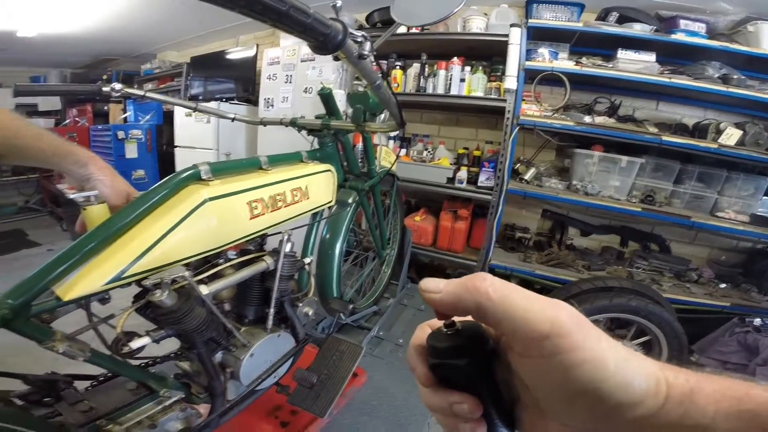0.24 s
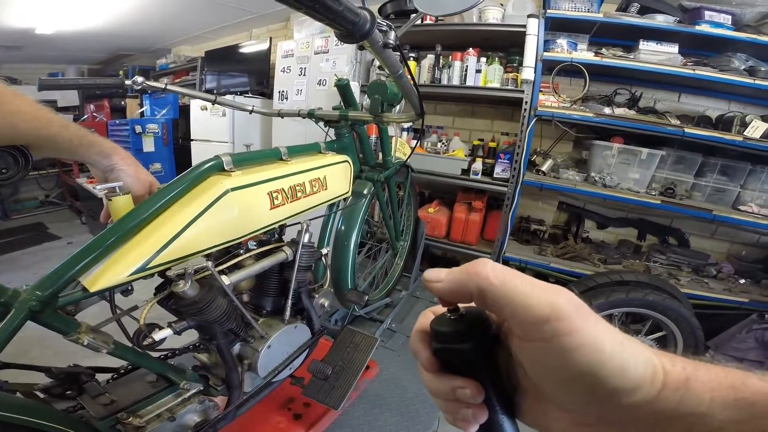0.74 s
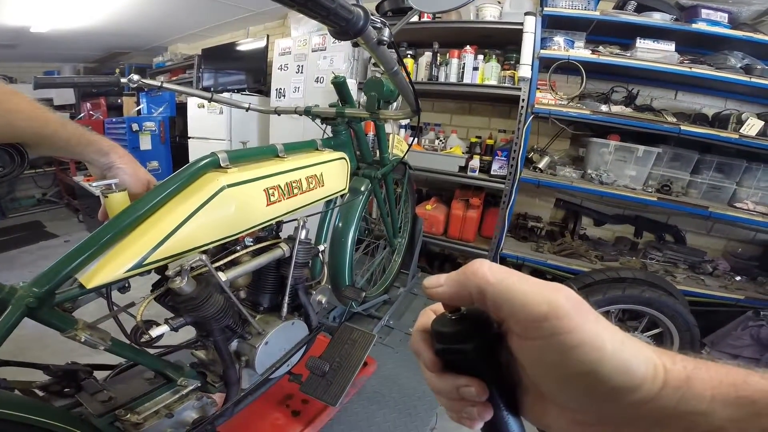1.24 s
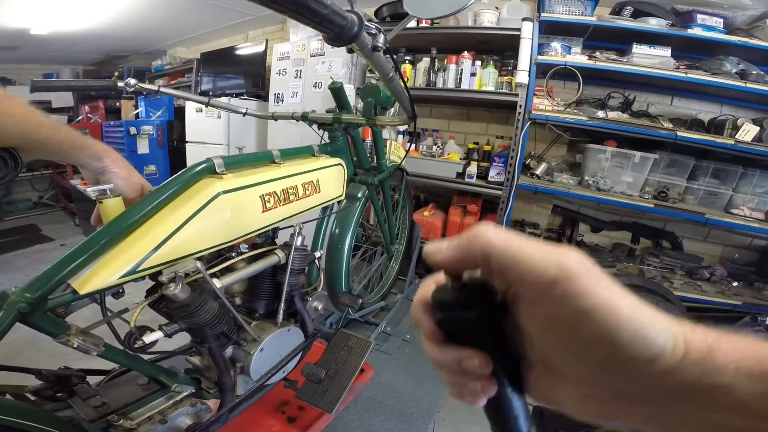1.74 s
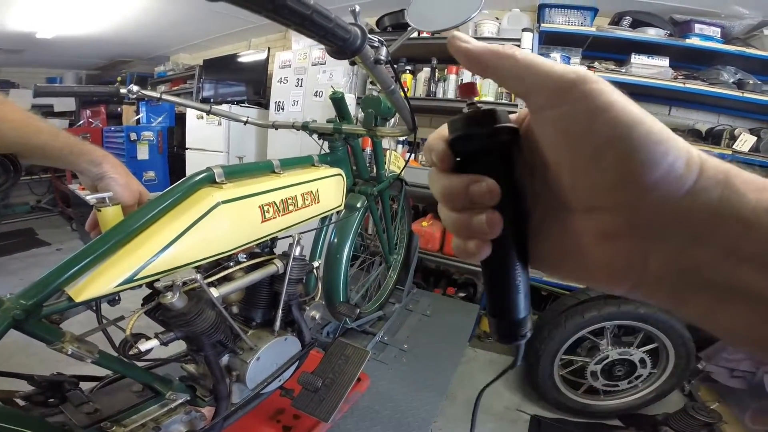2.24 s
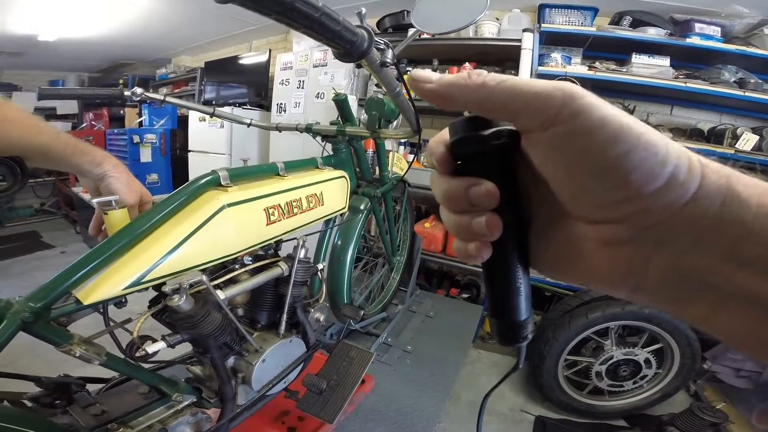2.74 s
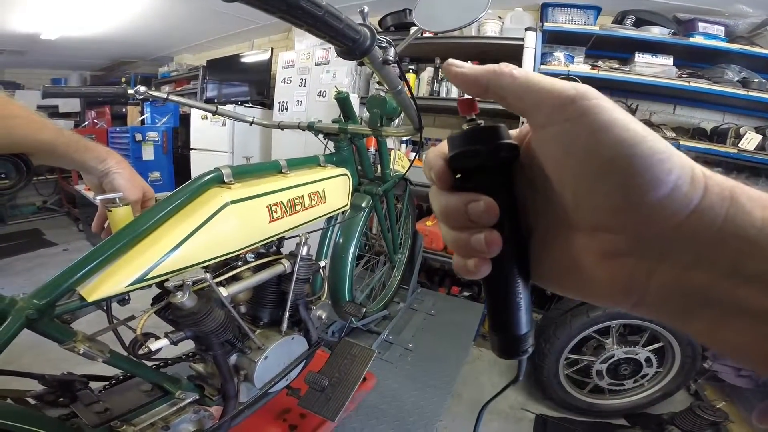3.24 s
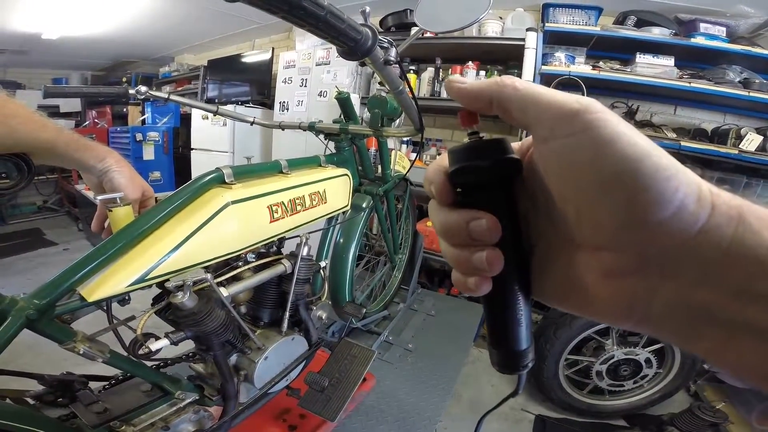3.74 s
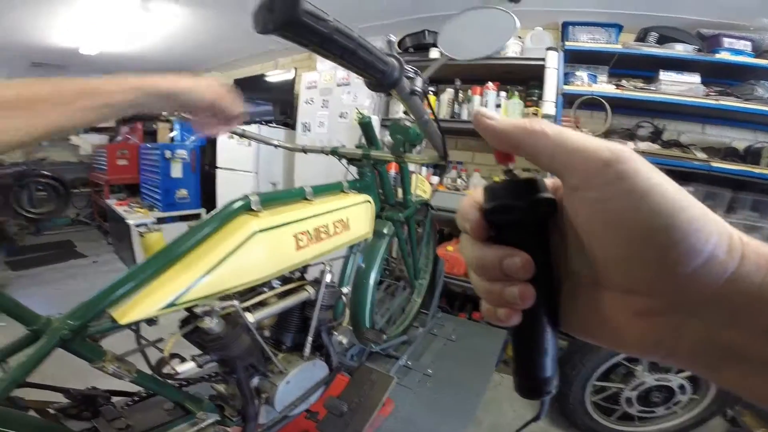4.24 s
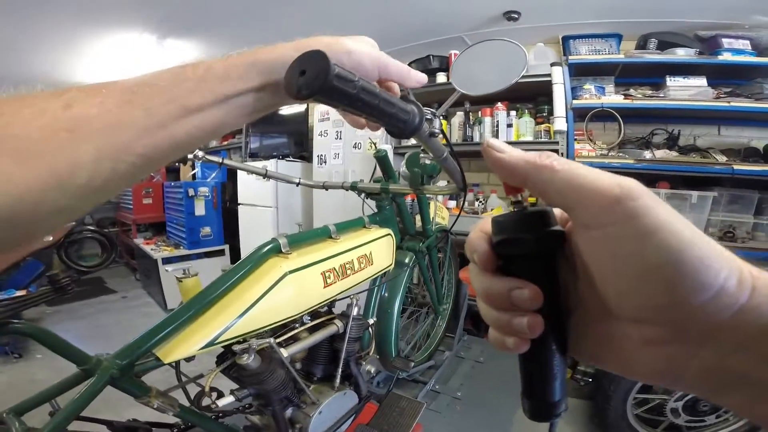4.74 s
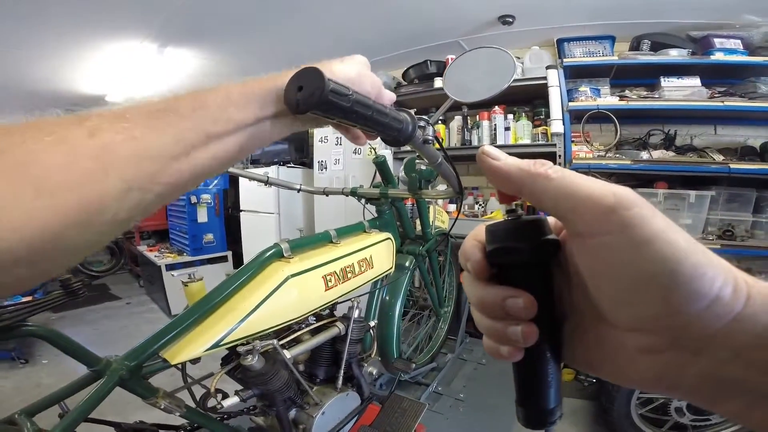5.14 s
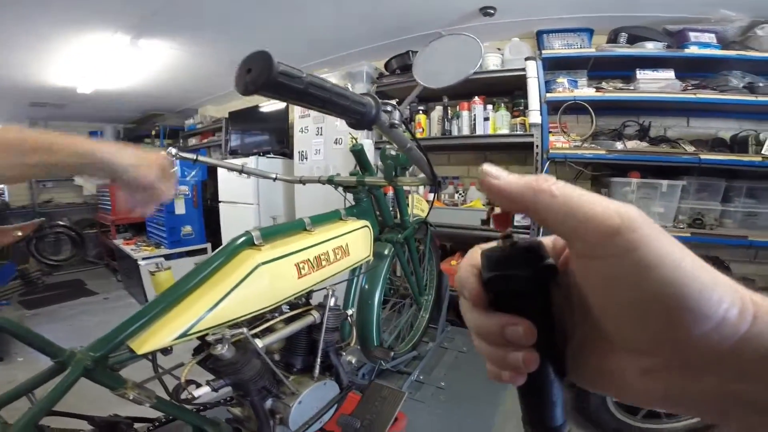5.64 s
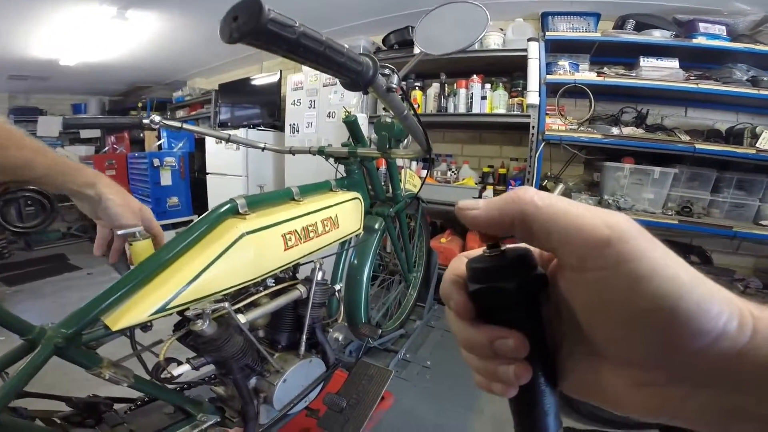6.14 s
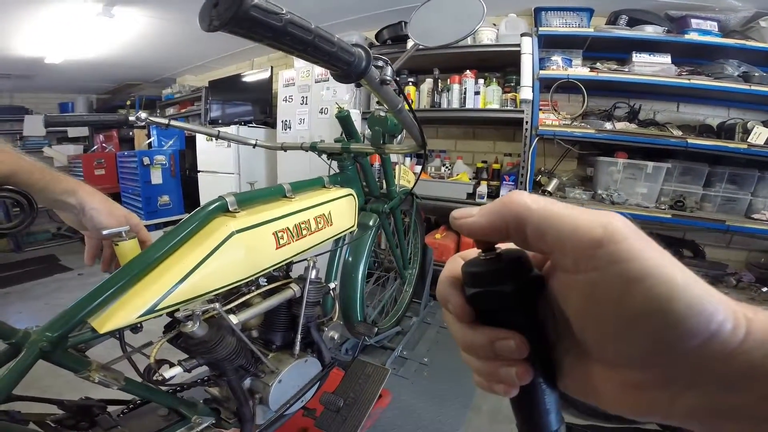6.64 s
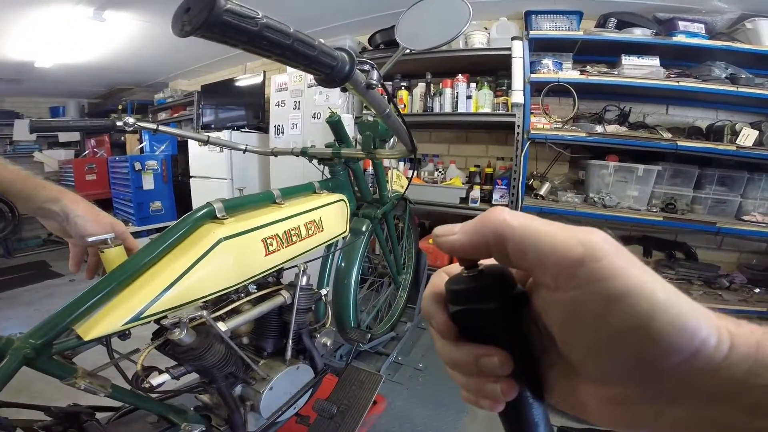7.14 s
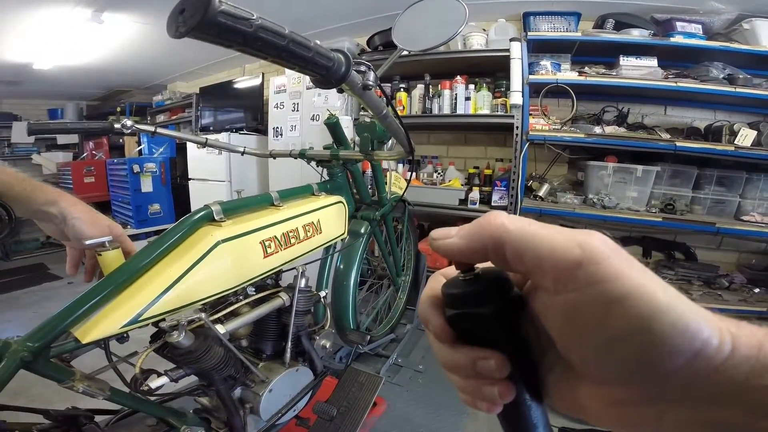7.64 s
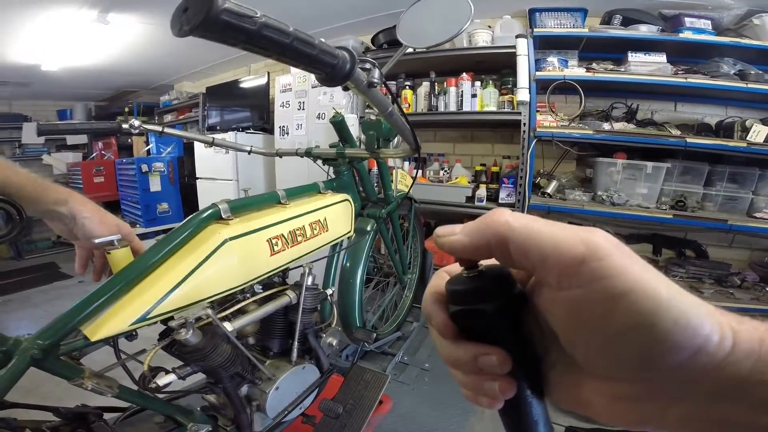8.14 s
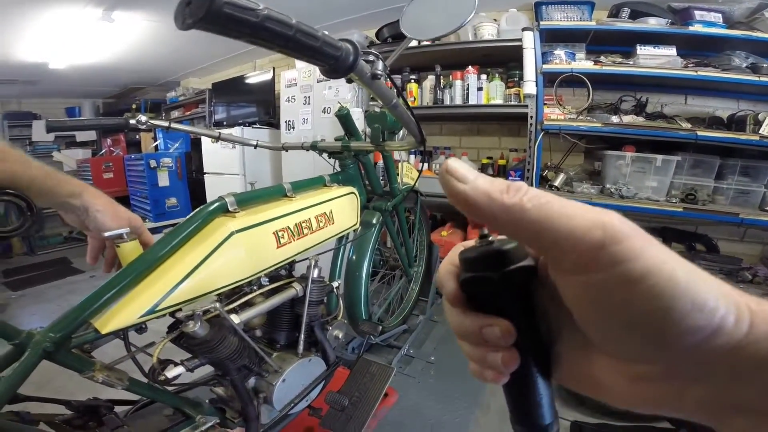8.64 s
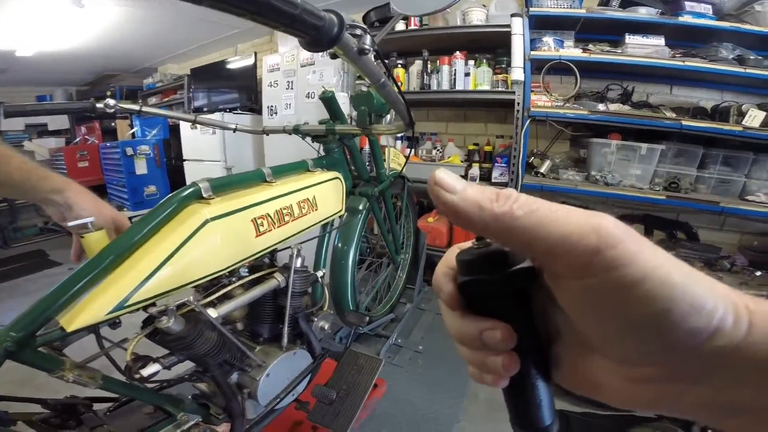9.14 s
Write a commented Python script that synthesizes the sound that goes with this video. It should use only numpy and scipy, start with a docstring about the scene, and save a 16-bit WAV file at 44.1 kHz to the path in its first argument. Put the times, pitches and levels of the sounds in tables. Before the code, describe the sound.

In a small workshop, two harsh geared starter bursts rise to a rasping whine with uneven engine puffs, then clatter loose and coast down.

```python
"""A gear rattle dies away first; then an electric starter cranks an old V-twin motorcycle twice, but it never fires.
Straight-cut gears whine in harmonics of the mesh rate and rasp as scraped noise, both coloured by their housing.
At speed the cylinders puff in uneven pairs: short pushes and noise bursts that ring the frame.
After each release noise bursts clack through the backlash, and a coasting armature whistles thinly downward.
A hand rubs and ticks lightly between the bursts; a small workshop reflects it all over faint air and whistle."""
import sys
import numpy as np
from scipy import signal
from scipy.fft import rfft, irfft
from scipy.io import wavfile

SR = 44100
rng = np.random.default_rng(int(sys.argv[2]) if len(sys.argv) > 2 else 0)


def master(y):
    """Save y as 16-bit WAV."""
    cut = np.clip(np.atleast_2d(y).T, -1, 1)
    pcm = np.round(cut * 32767)  # scale
    wavfile.write(sys.argv[1], SR, pcm.astype(np.int16))


N = 414981
TIME = np.arange(N) / SR  # s

# armature coasting: (whistle emerges [s], rotor at rest [s], relative level [dB])
COASTS = [(2.881, 3.95, -57), (9.051, 10.33, -68)]
# drive taking up its slack: (time [s], relative peak [dB], relative treble against middle [dB])
CLACKS = [(0.914, -31, -1), (2.365, -16, -6), (2.502, -18.5, -6.5), (2.62, -18, -5.5), (2.747, -23.5, -30),
          (2.867, -29, -21), (2.925, -48, -16), (2.969, -30.5, -29), (8.728, -16.5, -7.5),
          (8.809, -33, -12), (8.831, -14, -7), (8.984, -20.5, -7.5), (9.128, -22.5, -4), (9.285, -25, -38)]
# frame resonances: (centre [Hz], width [Hz], height over the broad response [dB])
FRAME_RINGS = [(151.5, 18, 5.8)]


def undb(db):
    """Amplitude ratio from its logarithmic measure in decibels."""
    return 10 ** (np.asarray(db) / 20)


def unit(x):
    """Normalisation to a root-mean-square of 1."""
    return x / np.sqrt(np.mean(x ** 2))


def noise():
    """White noise: equal mean power at every frequency."""
    return rng.standard_normal(N)


def walk(rate):
    """Random modulation: linear interpolation between random knots, rate of them per second, rms 1."""
    knots = rng.standard_normal(2 ** 14)
    return unit(np.interp(TIME * rate, np.arange(len(knots)), knots))


def since(s):
    """Elapsed time in seconds since a moment, zero before it."""
    return np.maximum(TIME - s, 0)


def gate(start, end, fade=0.01295):
    """Rectangular window with Gaussian skirts: one from start to end, fading quickly outside."""
    outside = np.maximum(start - TIME, TIME - end)
    return np.exp(-(np.maximum(outside, 0) / fade) ** 2)


def blow(s, rise, fall):
    """Envelope of one contact: a quadratic rise, then exponential decay, within half a second."""
    envelope = np.zeros(N)
    span = slice(int(s * SR), int(s * SR) + SR // 2)
    age = TIME[span] - s
    attack = np.clip(age / rise, 0, 1) ** 2
    envelope[span] = attack * np.exp(-np.maximum(age - rise, 0) / fall)
    return envelope


def convolve(x, response):
    """Linear superposition: the sound passes through an impulse response."""
    return signal.fftconvolve(x, response)[:N]


def colour(x, points, peaks=(), size=8192):
    """Minimum-phase filter of unit power: a broad spectrum with resonances on top."""
    f = np.maximum(np.fft.rfftfreq(size, 1 / SR), 1)
    hz, db = np.transpose(points)
    shape_db = np.interp(np.log(f), np.log(hz), db)
    for centre, width, height in peaks:
        shape_db = shape_db + height / (1 + (2 * (f - centre) / width) ** 2)
    # folding the cepstrum onto positive time makes the response causal
    cepstrum = irfft(np.log(undb(shape_db)))[:size // 2]
    cepstrum[0] /= 2
    response = irfft(np.exp(rfft(2 * cepstrum, size)))
    return convolve(x, response / np.linalg.norm(response))


def workshop(x, t60_low=0.46, t60_high=0.11):
    """Diffuse reverberation of a small cluttered room: dense at once, its treble decaying faster (T60 in s)."""
    t = TIME[:SR]
    scatter = rng.standard_normal(SR)
    low = signal.sosfilt(signal.butter(1, 3500, fs=SR, output="sos"), scatter)
    high = scatter - low
    tail = low * undb(-60 * t / t60_low) + high * undb(-60 * t / t60_high)
    tail = tail * np.clip(t / 0.0019, 0, 1)
    return convolve(x, tail / np.linalg.norm(tail))


def background(air_db=-56):
    """Stationary sound: still room air as coloured noise, and steady sinusoids as an electrical whistle."""
    # room air: (frequency [Hz], relative spectral density [dB])
    air = [(20, -3.5), (128, -4.5), (555, -13), (1140, -18), (1600, -18.5), (2550, -21.5), (3460, -25.5),
           (7000, -32), (10500, -37.5), (12700, -43), (15000, -46.5)]
    # electrical whistle: (frequency [Hz], rms level [dB])
    whistle_tones = [(11719, -76), (14626, -84)]
    whistle = sum(np.sqrt(2) * undb(db) * np.sin(2 * np.pi * hz * TIME) for hz, db in whistle_tones)
    return undb(air_db) * unit(colour(noise(), air)) + whistle


def handling(tick_db=-4, rub_db=-3, grain_db=4):
    """Friction and impact of a hand on the tank and levers: half-sine swells of grainy noise, and short ticks."""
    # light ticks of the controls: (time [s], relative peak [dB])
    tick_times = [(4.123, -46), (4.1743, -37.5), (4.2313, -52), (4.571, -47.5), (4.8995, -46),
                  (5.2867, -47)]
    # soft rubs: (start [s], length [s], relative level [dB])
    rub_times = [(3.934, 0.45, -58), (4.25, 0.55, -59.5), (4.7, 0.45, -66), (5.398, 0.26, -55.5)]
    # response of the touched parts: (frequency [Hz], relative spectral density [dB])
    touched = [(400, 3), (1000, -11), (1550, 5), (1900, -3), (2500, 7.5), (3100, -9), (4000, -20),
               (10000, -26)]
    ticks = sum(undb(db + tick_db) * blow(s, 0.0015, 0.0032) for s, db in tick_times)
    rubs = sum(undb(db) * np.sin(np.pi * np.minimum(since(s) / length, 1)) for s, length, db in rub_times)
    grain = undb(rub_db + grain_db * walk(70))
    return colour(noise() * (ticks + rubs * grain), touched)


def drone(rise=.05, fall=0.13):
    """Forced vibration: the slowly turning drive shakes the frame in brief swells of low noise."""
    # drone swells: (start [s], relative level [dB])
    swells = [(0, -34), (.92, -29.5), (6.208, -29.5)]
    # frame response: (frequency [Hz], relative spectral density [dB])
    frame = [(60, -26.5), (125, -29.5), (155, -2), (230, -6), (310, -6), (450, -8.5), (800, -21),
             (8000, -61)]
    shaking = sum(undb(db) * blow(s, rise, fall) for s, db in swells)
    return colour(noise() * shaking, frame, FRAME_RINGS)


def armature(start, rest, level_db, waver=0.0091, patchy_db=6.5, orders_db=(-5, -14, -13, -21),
             hiss_db=-5.0, lead_s=.1):
    """Commutation noise: brushes skip over the bars, a patchy harmonic whistle falling with speed into hiss."""
    # motor case response: (frequency [Hz], relative level [dB])
    case = [(500, -30), (1800, -15), (2400, -4), (3000, -3), (4500, -10.5), (6500, -8), (9500, -8),
            (11000, -17), (15000, -32)]
    # case resonances: (centre [Hz], width [Hz], height over the broad response [dB])
    case_rings = [(2930, 410, 6), (4000, 200, 14), (5330, 260, 10), (6760, 350, 8)]
    slowing_hz_per_s = 3800  # friction slows the commutator rate steadily
    fade_hz = 2400  # below this rate the whistle fades with the speed
    hz = slowing_hz_per_s * np.clip(rest - TIME, 0, rest - start + lead_s)
    phase = 2 * np.pi * np.cumsum(hz * (1 + waver * walk(600))) / SR
    tone = sum(undb(db + patchy_db * walk(35)) * np.sin((k + 1) * phase) for k, db in enumerate(orders_db))
    fade = np.minimum(hz / fade_hz, 1)
    hiss = undb(hiss_db) * noise() * np.sqrt(fade)
    return colour(tone * fade ** 2 + hiss, case, case_rings) * gate(start, rest) * undb(level_db)


def run_out(chatter_db=3, lurch_db=1.1, shaken_db=-21, shaken_rise=.014, shaken_s=0.04,
            coasting_db=-4, strain_db=6, strain_s=0.021):
    """Backlash rattle: unloaded teeth make uneven noise after releases, around clacks and in the coasts."""
    # gears running out with the power off: (start [s], relative level [dB], fall [dB/s])
    run_outs = [(0, -23.5, 90.5), (2.269, -35, 33.5), (8.63, -38, 22)]
    # loose drive: (frequency [Hz], relative spectral density [dB])
    rattle = [(100, -18), (250, -1.5), (400, -1), (700, -10.5), (1400, -1.5), (2000, -7.5), (2800, -4),
              (4300, -8.5), (6200, -3.5), (7800, -12), (10500, -18), (15000, -27.5)]
    # its resonances: (centre [Hz], width [Hz], height over the broad response [dB])
    rattle_rings = [(1620, 180, 3.2), (2540, 140, 11), (2900, 120, 9.4), (3415, 98, 3.8), (4000, 200, 6.3),
                    (5294, 360, 4.9), (6100, 200, 4)]
    released = sum(gate(s, s + 2) * undb(db - fall * since(s)) for s, db, fall in run_outs)
    # the rattle swells as the slack is taken up just before a clack
    strain = sum(gate(s, s, strain_s) * (TIME < s) for s, _, _ in CLACKS)
    shaken = sum(undb(db + shaken_db) * blow(s, shaken_rise, shaken_s) for s, db, _ in CLACKS)
    coasting = 0
    for s, rest, db in COASTS:
        slowing = np.sqrt(np.clip((rest - TIME) / (rest - s), 0, 1))
        coasting = coasting + gate(s, rest) * undb(db + coasting_db) * slowing
    grains = noise() * undb(chatter_db * walk(260) + lurch_db * walk(60))
    # independent noises add in power
    envelope = np.sqrt((released * undb(strain_db * strain)) ** 2 + shaken ** 2 + coasting ** 2)
    return unit(colour(grains, rattle, rattle_rings)) * envelope


def clacks(rise=0.0053, fall=0.0045, clack_db=1, bright_db=5, lead_s=0.016, lead_db=-19):
    """Impact across backlash: a faint scrape leads a short noise burst with its own balance of treble."""
    # metal contact: (frequency [Hz], relative spectral density [dB])
    metal = [(120, -25.5), (200, -14), (929, -20), (1660, 0), (1980, -7), (2420, 0), (2750, -12.5),
             (3060, -3.5), (3600, -11), (5260, -4), (6530, -8), (7420, -10), (13200, -26), (15000, -27)]
    body, edge = np.zeros(N), np.zeros(N)
    for s, db, treble_db in CLACKS:
        contact = blow(s, rise, fall) + undb(lead_db) * blow(s - lead_s / 2, lead_s / 2, lead_s)
        body += undb(db) * contact
        edge += undb(db + treble_db + bright_db) * contact
    grit = noise()
    low = signal.sosfiltfilt(signal.butter(2, 4000, fs=SR, output="sos"), grit)
    return undb(clack_db) * colour(low * body + (grit - low) * edge, metal)


def clack_puffs(puff_db=-7, hardness=.4, lead_s=0.0017):
    """Shared impulse: (time [s], relative level [dB]) of puffs with the clacks, stronger for more treble."""
    return [(s - lead_s, db + puff_db + hardness * treble_db) for s, db, treble_db in CLACKS]


def cranking_puffs(hz, first, release, db, overrun_s=.05):
    """Kinematic gearing: (time [s], relative level [dB]) of an uneven pair of puffs in each engine cycle."""
    teeth_per_cycle = 121.3
    second_lag, second_db = .455, 2.5  # the second cylinder: lag in cycles, and a little stronger
    swell_db_per_s = 2.5  # the puffs grow as the cranking goes on
    cycles = np.cumsum(hz) / SR / teeth_per_cycle
    first_cycle = np.interp(first, TIME, cycles)
    puffs = []
    for lag, extra_db in (0, 0), (second_lag, second_db):
        times = np.interp(first_cycle + lag + np.arange(10), cycles, TIME)
        for s in times:
            if s < release + overrun_s:
                puffs.append((s, db + extra_db + swell_db_per_s * (s - first)))
    return puffs


def cylinders(puffs, push_s=0.000077, thump_db=10, gas_db=-7, gas_s=0.0078):
    """Pressure release: each opening exhaust valve lets out a soft thump and a little rush of air."""
    # one puff: (frequency [Hz], relative spectral density [dB])
    puff = [(30, -17.5), (70, -7), (115, -14), (150, -1.5), (205, -2), (270, -7.5), (340, -15.5),
            (450, -17.5), (1000, -20.5), (8000, -60)]
    pushes = sum(undb(db) * blow(s + 0.00556, push_s, push_s) for s, db in puffs)
    rush = sum(undb(db) * blow(s, 0.0026, gas_s) for s, db in puffs)
    return colour(undb(thump_db) * pushes + undb(gas_db) * noise() * rush, puff, FRAME_RINGS)


def scuffs(puffs, scuff_db=0, rise=.006, fall=.006):
    """Load-dependent friction: the teeth scrape harder for a moment just after each puff begins."""
    # bright scuff of the teeth: (frequency [Hz], relative spectral density [dB])
    scuff = [(500, -19), (1600, 4.5), (3000, -3), (6000, 1), (10000, -3), (15000, -17.5)]
    jolts = sum(undb(db + scuff_db) * blow(s + 0.0024, rise, fall) for s, db in puffs)
    return colour(noise() * jolts, scuff)


def jolt(puffs, rise=0.004, fall=0.011):
    """Transient disturbance: how far the teeth are thrown out of true after each puff."""
    return sum(blow(s, rise, fall) for s, _ in puffs)


def power(speed, release):
    """Exponential decay: on from the first turn until the switch is released, then dying away."""
    release_db_per_s = 158.5
    return gate(speed[0][0], release + .5) * undb(-release_db_per_s * since(release))


def hum(hz, on, floor_db=-54, flutter_db=1.83, patchy_db=2.4, wobble=0.0038):
    """Forced resonance: the starter rocks on its mount at the mesh rate, most where that meets a resonance."""
    # mount resonances: (centre [Hz], width [Hz], relative hum level [dB])
    mount = [(310, 70, -28), (410, 34, -32.5), (490.4, 24, -37), (578, 8.2, -40)]
    phase = 2 * np.pi * np.cumsum(hz * (1 + wobble * walk(70))) / SR
    swing = undb(floor_db)
    for centre, width, db in mount:
        swing = swing + undb(db) / (1 + (2 * (hz - centre) / width) ** 2)
    unevenness = undb(flutter_db * walk(170) + patchy_db * walk(14))
    return np.sqrt(2) * np.sin(phase) * on ** 2 * swing * unevenness


def gears(hz, on, upset, upset_db=-6, wobble=.003, slip=0.012, bounce=.07, chatter_hz=440, runout=0.13,
          flutter_db=0.5, surge_db=0.5, shimmer=0.49, wander_db=1.87, contact=0.92, whine_db=2.5,
          rasp_ring=.55, count=9):
    """Gear meshing: tooth harmonics ring the housing, contacts scrape, and pinion runout adds sidebands."""
    # response to speed: (mesh rate [Hz], relative level [dB], relative whine against rasp [dB])
    gear_law = [(154.5, -34.5, -12), (183, -24, -7), (290, -15, -2.5), (400, -16, -.5), (467, -15, 4),
                (519, -15.5, 2.5), (550, -17, -0.5), (573.5, -16, 1.5), (572.5, -17, -2)]
    # whine and rasp spectra: (frequency [Hz], relative spectral density [dB])
    whine_spectrum, rasp_spectrum = [(300, -22), (700, -7), (950, -4.5), (1150, -7.5), (2000, -4),
                                     (3000, -5), (4250, -6), (5500, 0), (6900, 0.5), (8000, -9), (9500, -8),
                                     (10500, -19.5), (14500, -22)], [(90, -20.5), (170, -14.5), (330, -10.5), (700, -13),
                                                    (1150, -8.5), (1600, -9.5), (2000, -7), (3000, -4),
                                                    (4250, -6), (5500, 0), (6900, -2), (8000, -7.5),
                                                    (9500, -10), (10500, -14), (14500, -20)]
    # housing resonances: (centre [Hz], width [Hz], relative height over the broad response [dB])
    housing = [(820, 46, 4), (967.5, 84, 4.5), (1158, 9.7, 12), (1309, 80, 13), (1592, 130, 15.5),
               (1652, 230, 4), (2445, 450, 14.5), (2530, 15, 11), (2821, 62, 10), (2950, 91, 14),
               (3100, 89, 4.5), (3277, 240, 8.5), (3492, 135, 16), (3840, 98, -0.5), (3892, 290, 11.5),
               (4680, 300, 8.5), (5136, 79, 9), (5290, 217, 8.5), (5565, 222, 1.5), (5963, 74, 7),
               (6147, 158, 7)]
    law_hz, *law = np.transpose(gear_law)
    level_db, clean_db = (np.interp(hz, law_hz, column) for column in law)
    mesh = np.cumsum(hz * (1 + wobble * walk(70))) / SR
    # the teeth bounce while the drive is still slow
    chatter = np.clip((chatter_hz - hz) / 150, 0, 1)
    # backlash lets the teeth land early or late, which blurs the high orders
    mesh = mesh + (slip + bounce * chatter) * walk(330)
    load = 1 + runout * np.sin(2 * np.pi * mesh / count)
    load = load * undb(flutter_db * walk(170) + surge_db * walk(20))
    live = on > 1e-2
    turn, teeth = mesh[live] - mesh[live][0], np.zeros(N)
    steps = np.arange(400)
    for k in range(2, 23):
        # an order's strength varies from turn to turn of the pinion, and slowly as the contact patch shifts
        strength = 1 + shimmer * np.interp(turn / count, steps, rng.standard_normal(len(steps)))
        strength *= undb(wander_db * np.interp(turn / count ** 2, steps, rng.standard_normal(len(steps))))
        # each order has its own random phase
        teeth[live] += strength * np.cos(2 * np.pi * (k * turn + rng.random()))
    whine = colour(teeth * load, whine_spectrum, housing)
    scrape = noise() * load * np.exp(-(mesh % 1) / contact)
    rasp = colour(scrape, rasp_spectrum, [(f, width, rasp_ring * db) for f, width, db in housing])
    whine, rasp = whine / whine[live].std(), rasp / rasp[live].std()
    # whine and rasp share the power of the drive; the whine needs load and breaks up at each puff
    song = undb(whine_db + clean_db + upset_db * upset) * on
    return on * undb(level_db) * (song * whine + rasp) / np.hypot(song, 1)


def scene(drive_wet_db=-11, knock_wet_db=-6):
    """Superposition: starter, engine and hands sound in one room, over its background."""
    # bursts under power: (first puff [s], switch released [s], relative puff level [dB])
    bursts = [(1.626, 2.258, -27.5), (7.655, 8.6, -29.5)]
    # starter speed, one curve per burst: (time [s], tooth mesh rate [Hz])
    speeds = [
        [(.93, 155.3), (1.05, 282.8), (1.14, 366.2), (1.31, 454.7), (1.48, 488), (1.6, 521.6), (1.7, 530.6),
         (1.83, 558), (2.08, 580), (2.24, 582), (2.34, 562.5)],
        [(6.21, 153.2), (6.34, 284), (6.44, 371.4), (6.54, 410.4), (6.62, 436.4), (6.79, 464.5), (7.05, 475.2),
         (7.37, 504.8), (7.62, 522.7), (7.74, 547.3), (7.99, 574.3), (8.37, 577.6), (8.48, 588), (8.61, 582.3),
         (8.71, 565.7)],
    ]
    drive, puffs = drone(), clack_puffs()
    for speed, (first_puff, release, puff_db) in zip(speeds, bursts):
        hz = np.interp(TIME, *np.transpose(speed))
        on = power(speed, release)
        puffs = puffs + cranking_puffs(hz, first_puff, release, puff_db)
        drive = drive + gears(hz, on, jolt(puffs)) + hum(hz, on)
    drive = drive + cylinders(puffs)
    coasting = sum(armature(*row) for row in COASTS)
    loose = run_out() + coasting + scuffs(puffs) + clacks() + handling()
    room = workshop(undb(drive_wet_db) * drive + undb(knock_wet_db) * loose)
    return (drive + loose + room + background())[None]


def record(dry):
    """Band limitation: a steep elliptic low-pass removes the extreme treble."""
    top_hz = 15250
    return signal.sosfilt(signal.ellip(12, .2, 80, top_hz, fs=SR, output="sos"), dry)


dry = scene()
out = record(dry)
master(out)
```